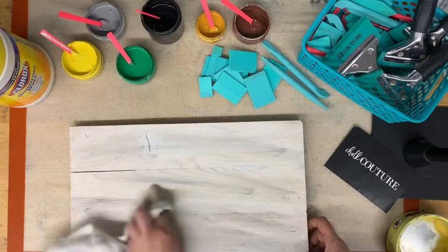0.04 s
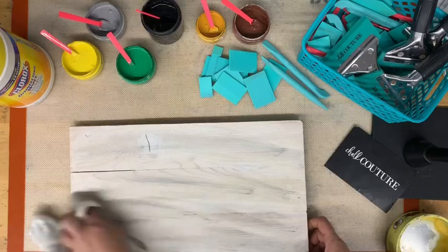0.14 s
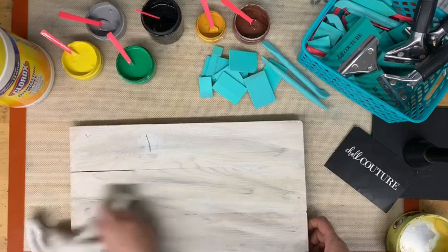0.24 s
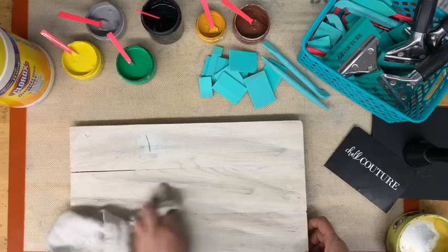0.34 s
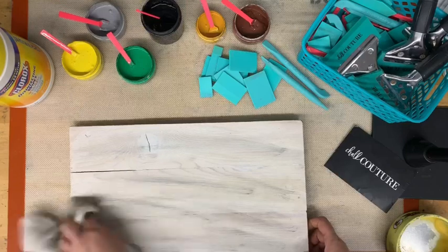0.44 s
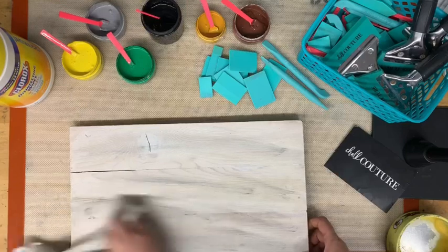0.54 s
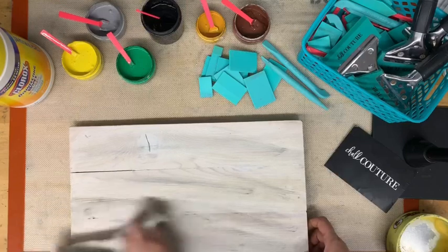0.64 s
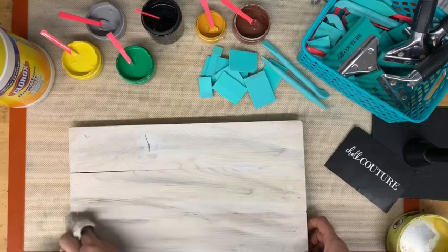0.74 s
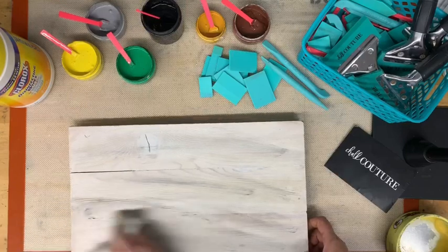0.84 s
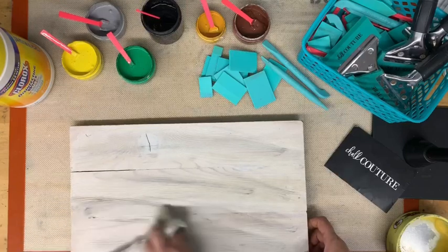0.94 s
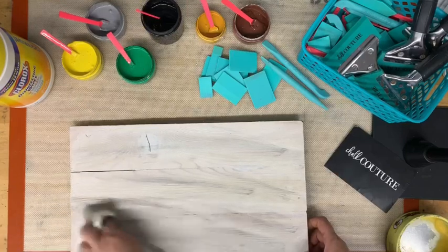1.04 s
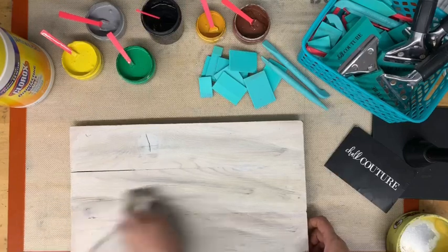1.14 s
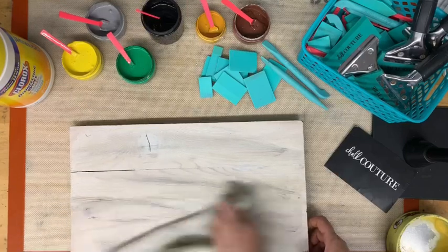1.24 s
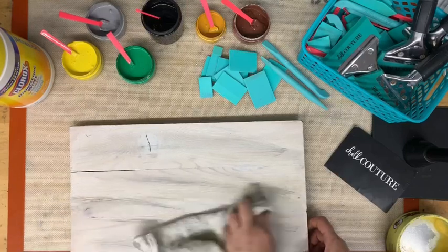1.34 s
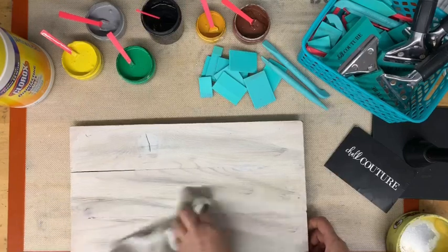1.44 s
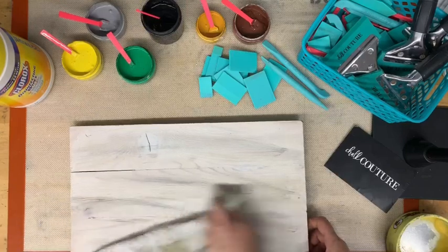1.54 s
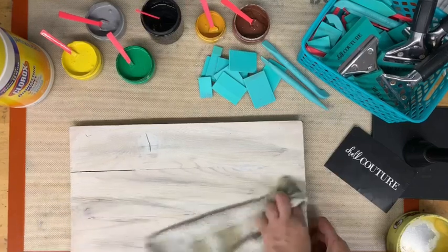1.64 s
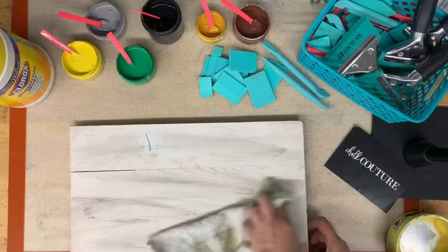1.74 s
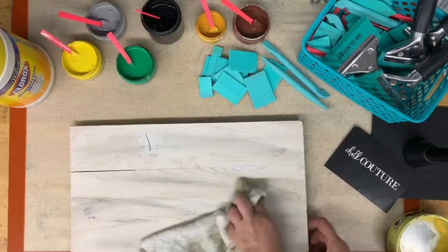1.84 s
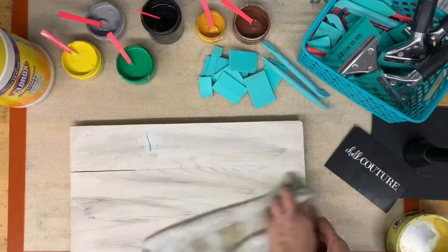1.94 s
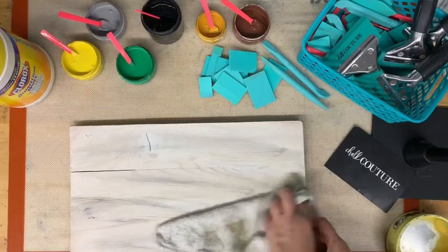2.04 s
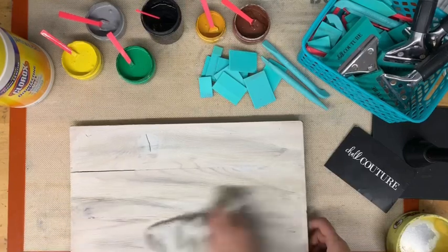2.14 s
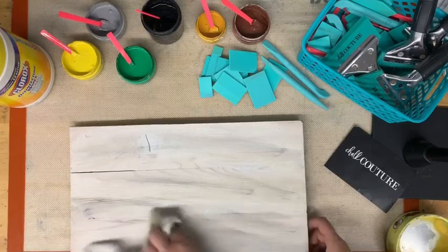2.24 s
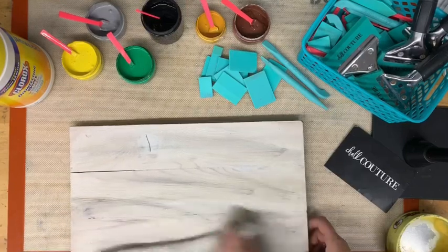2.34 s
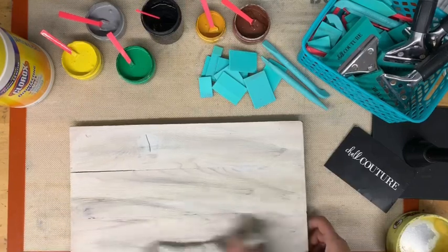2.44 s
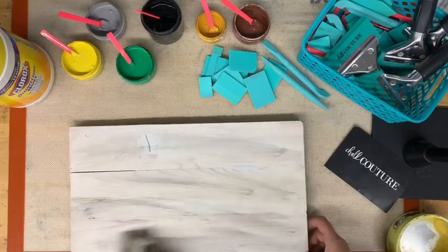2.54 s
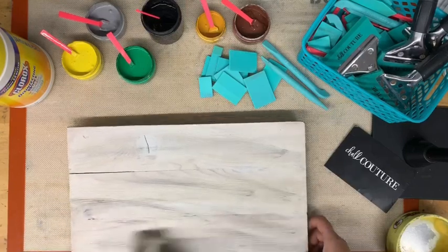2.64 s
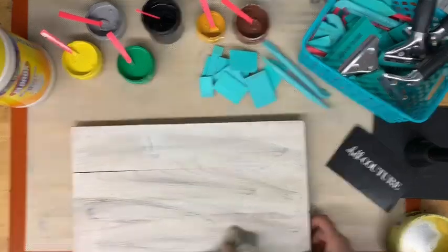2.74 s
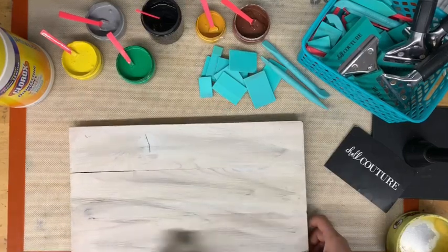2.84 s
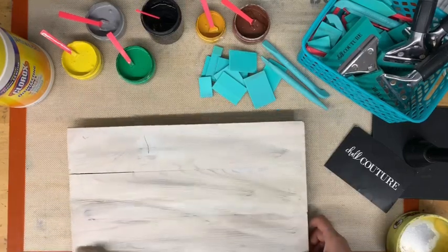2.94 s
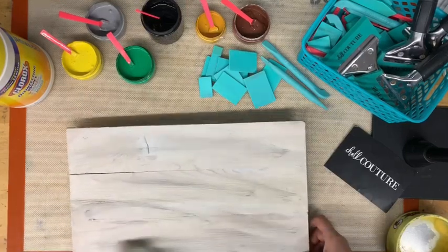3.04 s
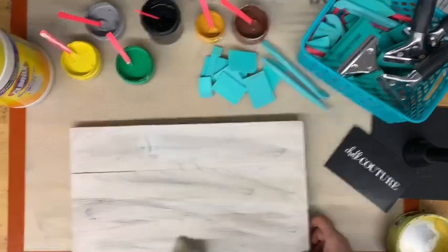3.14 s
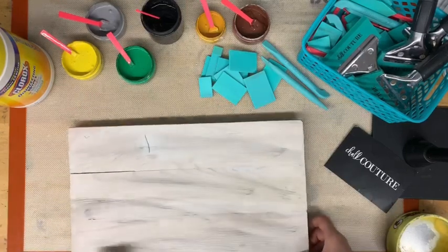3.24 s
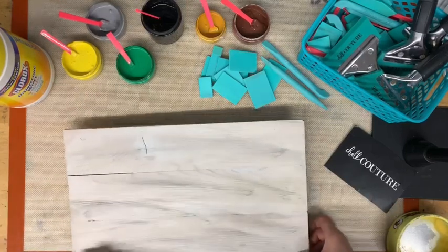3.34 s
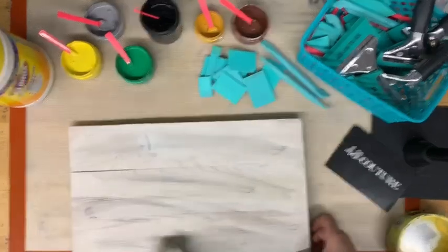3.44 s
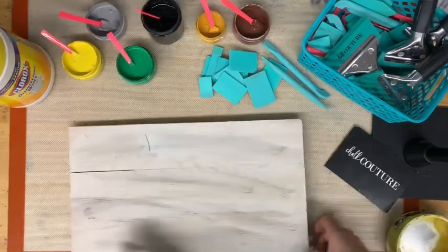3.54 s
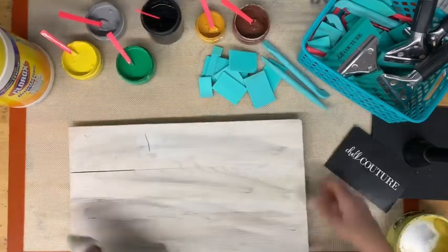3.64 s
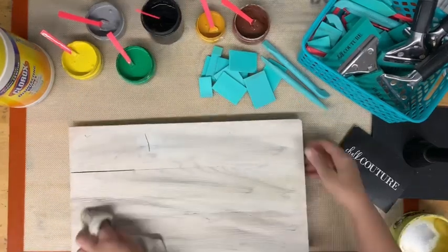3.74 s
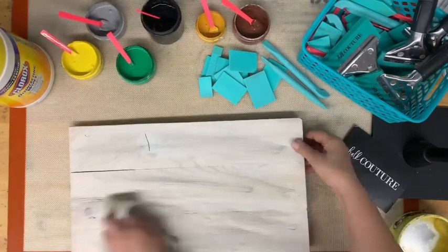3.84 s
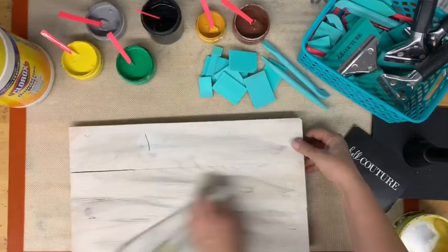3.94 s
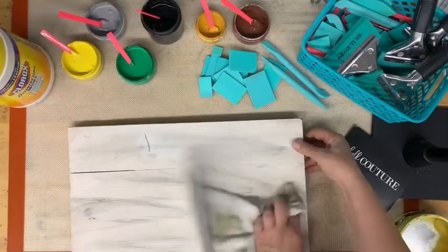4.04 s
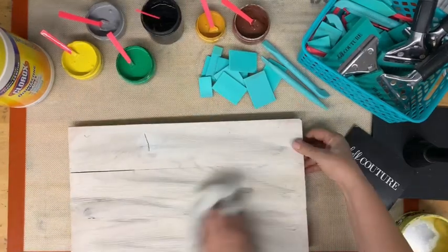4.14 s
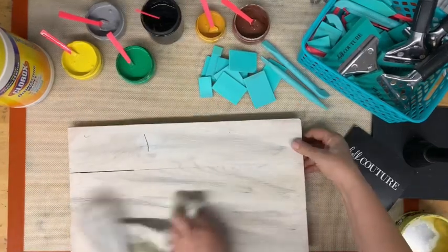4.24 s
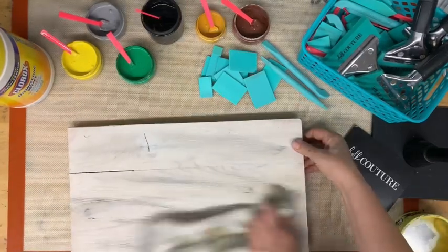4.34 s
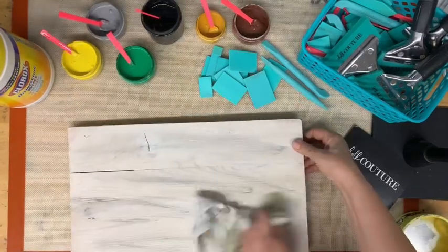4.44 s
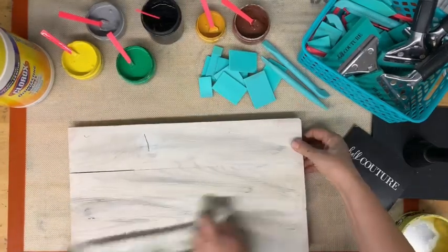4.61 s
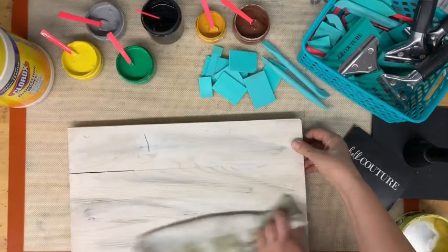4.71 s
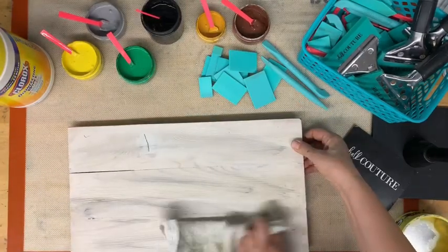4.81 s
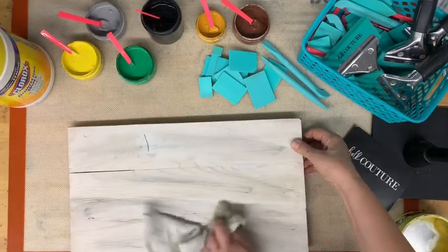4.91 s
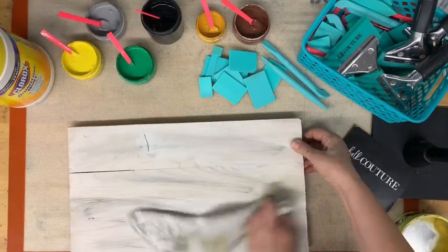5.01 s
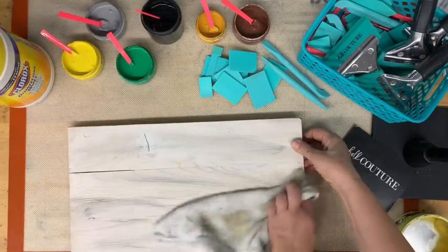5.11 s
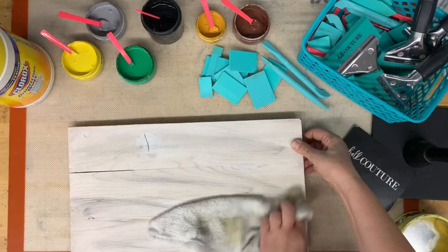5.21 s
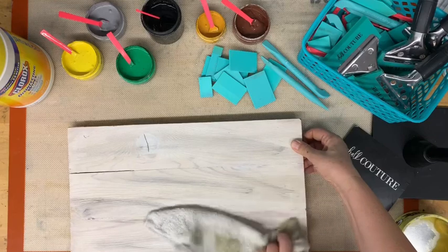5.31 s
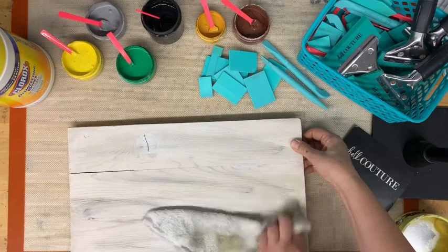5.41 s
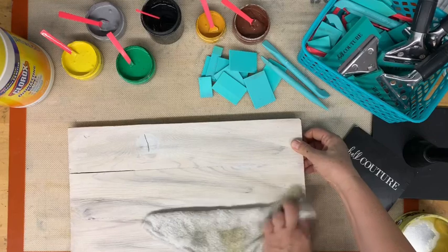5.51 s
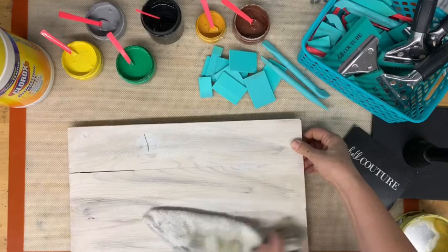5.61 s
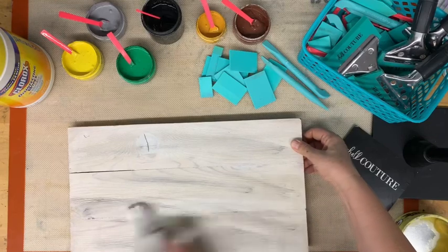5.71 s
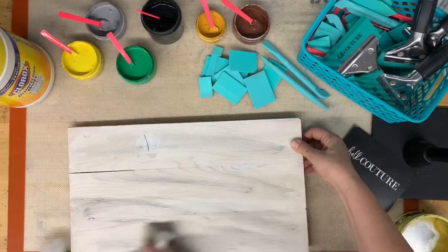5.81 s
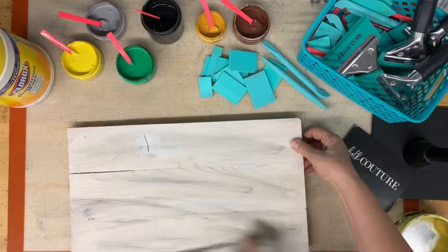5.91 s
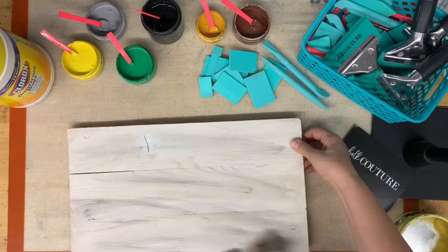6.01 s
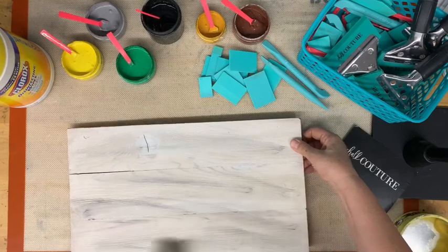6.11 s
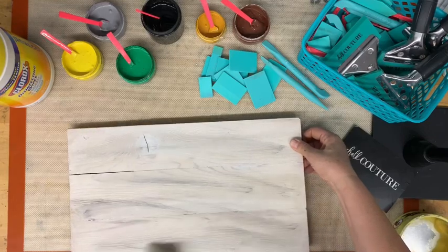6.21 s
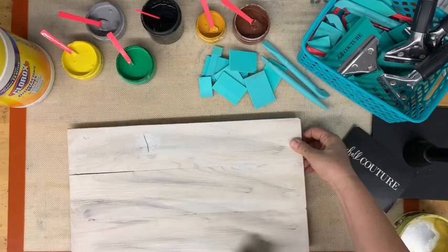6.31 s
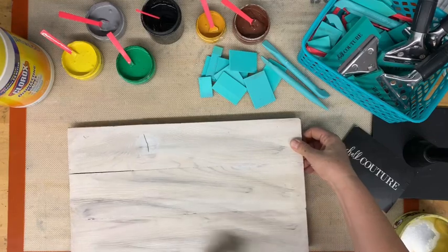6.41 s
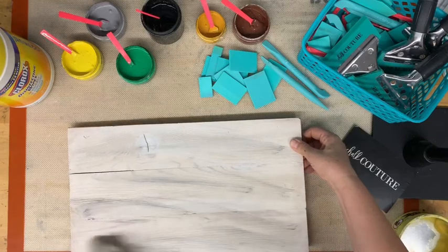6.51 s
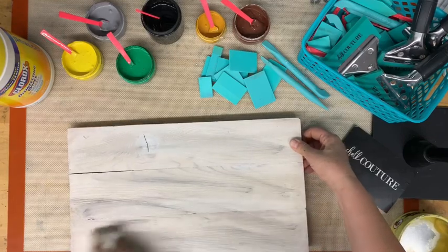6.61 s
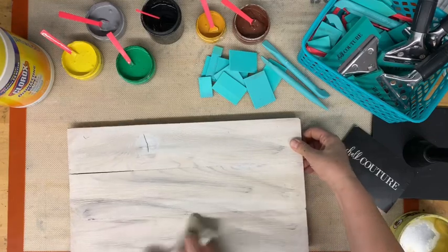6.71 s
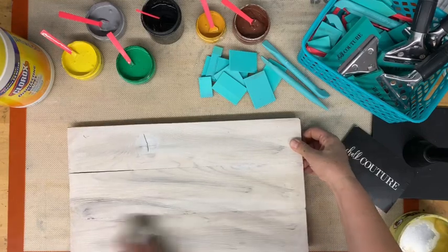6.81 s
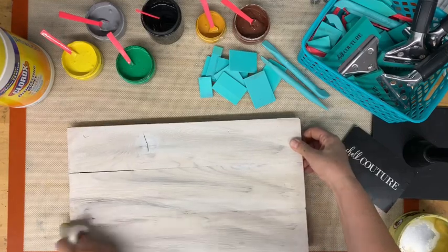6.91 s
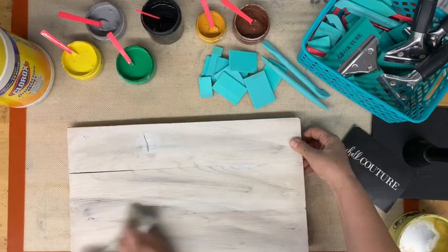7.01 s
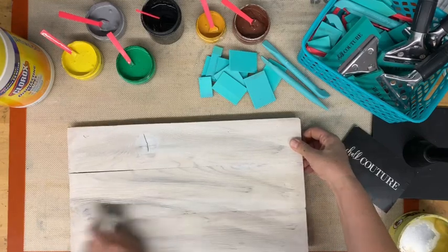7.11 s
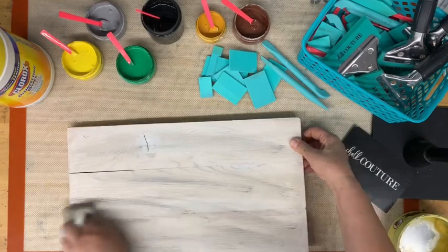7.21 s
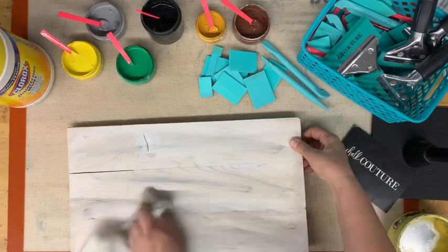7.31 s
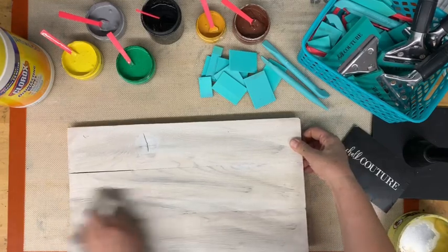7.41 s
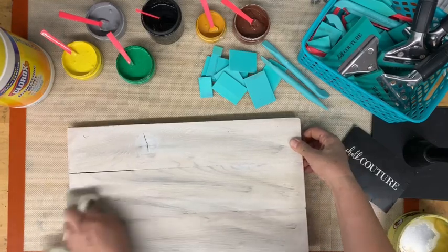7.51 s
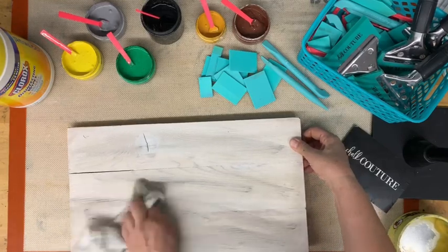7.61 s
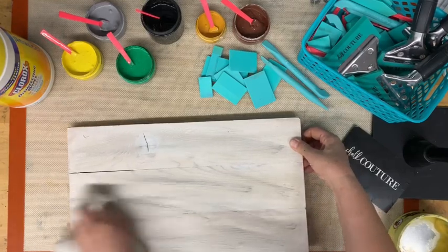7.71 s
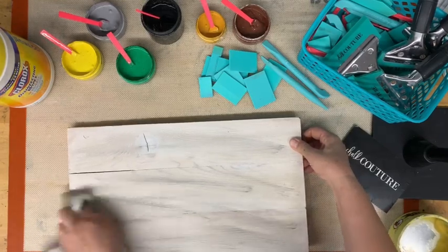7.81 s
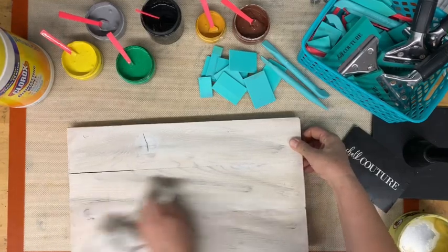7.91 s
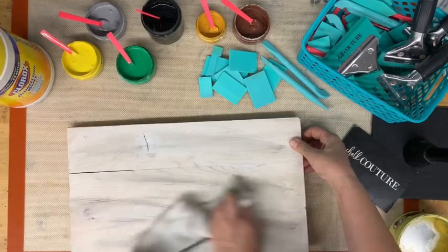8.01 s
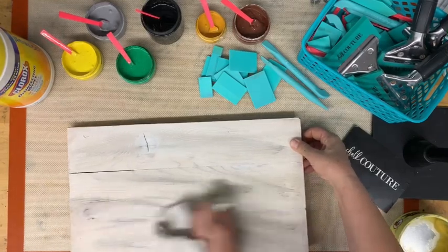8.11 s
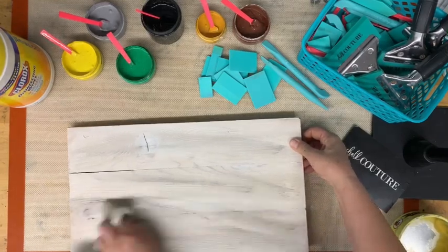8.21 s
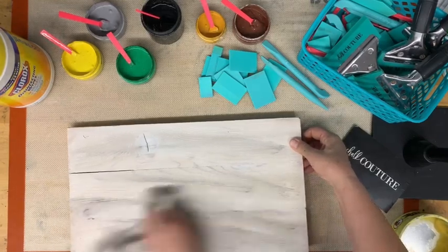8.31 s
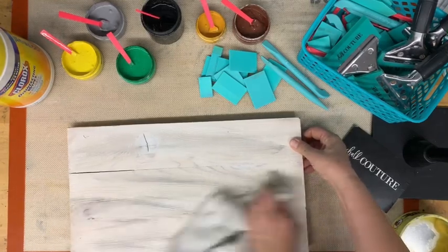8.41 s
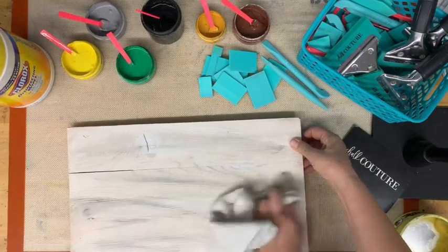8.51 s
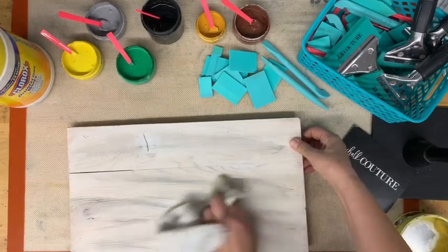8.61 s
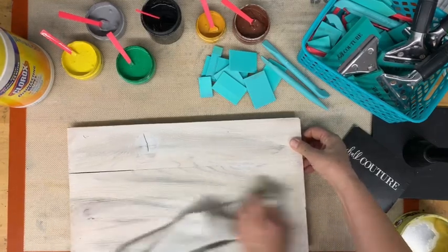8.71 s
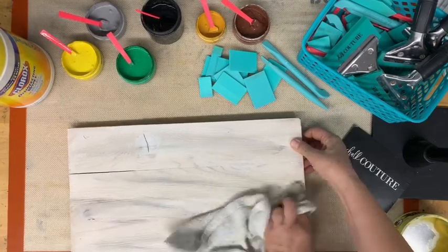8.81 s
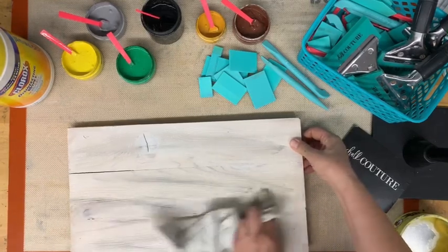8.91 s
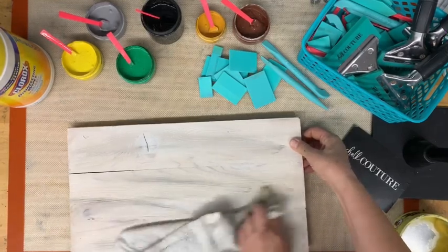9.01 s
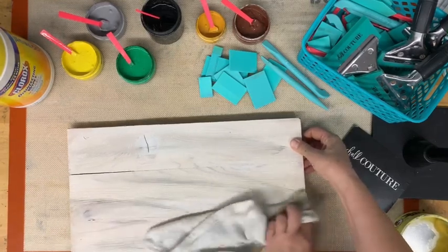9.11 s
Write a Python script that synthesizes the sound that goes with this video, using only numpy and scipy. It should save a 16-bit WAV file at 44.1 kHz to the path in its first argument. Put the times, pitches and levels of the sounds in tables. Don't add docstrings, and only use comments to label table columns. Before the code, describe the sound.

Close stereo pickup of fast cloth scrubbing on a loose board lying on a table. Airy fibre hiss swells and dips with each hand turn, with occasional small woody catches and muted thuds. Three sharp, very loud hollow slaps interrupt around the three-second mark, followed by a short pause in rubbing, then steady strokes continue, somewhat firmer around six to seven seconds. Quiet fan rumble and hum, short room reflections.

```python
import sys
import numpy as np
from scipy import signal
from scipy.fft import rfft, irfft, next_fast_len
from scipy.io import wavfile
from scipy.ndimage import uniform_filter1d, map_coordinates

SR = 44100
rng = np.random.default_rng(int(sys.argv[2]) if len(sys.argv) > 2 else 0)


def inscribe(sig):
    pcm = np.round(np.clip(np.atleast_2d(sig).T, -1, 1) * 32767)
    wavfile.write(sys.argv[1], SR, pcm.astype(np.int16))


def volts_from_decibels(level):
    exponent = np.asarray(level, float) / 20
    return 10 ** exponent


N = 403515

# (starting turn [s], pressure [dB], hiss left at the turn [dB], grip on wood [dB])
HAND_STROKES = [(-0.06, -43.5, -12, 1), (0.084, -41.5, -15, -1.5), (0.234, -42.0, -9.5, 1.5),
                (0.383, -41, -16, -2), (0.52, -43, -10.5, 1.5), (0.668, -41.0, -18, -1),
                (0.81, -40.5, -7.5, -3), (0.982, -46.0, -7, -1), (1.122, -43.5, -11, 1),
                (1.375, -49.5, -18, 4.5), (1.522, -46, -12, 0), (1.739, -50.5, -18, 2.5),
                (1.891, -46, -23, 0), (2.068, -47, -31, 0.5), (2.297, -43.5, -7, -0.5),
                (2.463, -40.0, -17, 0), (2.644, -42.5, -12.5, 3), (2.826, -41, -10, -1),
                (3.023, -44, -8.5, 2), (3.206, -44.5, -5, 3), (3.377, -44, -14, 5), (3.647, -47.5, -6, 2.5),
                (3.776, -42.5, -8.5, 2.5), (4.11, -45.5, -7, 4.5), (4.277, -42, -14, -1.5),
               (4.455, -44.5, -9.5, 0.5), (4.624, -43.5, -12.5, 0.5), (4.808, -45.5, -12.5, -1.5),
               (4.968, -44, -16, 2), (5.191, -45, -29, 6), (5.404, -45, -33, 5), (5.541, -43, -9, 0),
               (5.835, -39, -9.5, -4), (6.032, -41.5, -9, -3), (6.226, -41, -8.5, -0.5),
               (6.413, -37.5, -24, -3.5), (6.631, -38, -20.5, -1), (6.796, -36.5, -22, -4),
               (6.965, -41.5, -11, 0), (7.104, -42, -10.5, 0.5), (7.25, -41.5, -9, 2),
               (7.397, -42, -14, -2), (7.548, -41.0, -12, 0.5), (7.7, -40, -25, -2), (7.846, -41, -13, 3.5),
               (8.116, -43, -21, -1.5), (8.302, -40, -9, -0.5), (8.533, -46.5, -20, 1),
               (8.7, -45, -11, 2.5), (8.866, -46.5, -15, -0.5), (9.029, -43.5, -21.5, 0.5)]
STROKES = HAND_STROKES
# (frequency [Hz], level [dB], t60 [s])
TABLE_MODES = [(65.3, -7, 0.24), (88.2, -9.5, 0.28), (108.3, 0, 0.16), (152, -1.5, 0.062)]
# (frequency [Hz], level [dB], t60 [s])
BOARD_MODES = [(251.5, -8.5, 0.12), (271.7, -9.5, 0.4), (327, -1, .22), (354, -1.5, 0.13), (364, -9, 0.085),
               (385, -4, 0.1), (431, -5.5, 0.16), (530, -17, 0.077), (596, -30, 0.06), (673, 0, 0.13),
               (773, 0, 0.069), (930, -31, 0.124), (1050, -3, 0.07)]


def unit(x):
    return x / np.sqrt(np.mean(x ** 2) + 1e-20)


def along(points, hz):
    f, v = np.transpose(points)
    return np.interp(np.log(hz + 1), np.log(f + 1), v)


def wobble(knots_per_s):
    knots = rng.standard_normal(int(N * knots_per_s / SR) + 4)
    coarse = map_coordinates(knots, [np.arange(0, N + 8, 8) * knots_per_s / SR])
    return np.interp(np.arange(N) / 8, np.arange(len(coarse)), coarse)


def filtered(x, response):
    m = next_fast_len(N + 8192, True)
    return irfft(rfft(x, m) * response(np.fft.rfftfreq(m, 1 / SR)), m)[..., :N]


def resonances(modes):
    def response(f):
        return sum((-1) ** k * volts_from_decibels(db) * 1j * f * width / (hz * hz - f * f + 1j * f * width)
                   for k, (hz, width, db) in enumerate(modes))
    return response


def patchy(depth_db):
    z = signal.stft(rng.standard_normal((2, N)), nperseg=512)[2]
    field = uniform_filter1d(rng.standard_normal(z.shape[1:]), 2, 0)
    field = uniform_filter1d(field, 9, 1)
    return signal.istft(z * volts_from_decibels(depth_db * unit(field)), nperseg=512)[1][:, :N]


def lead(hz):
    # (frequency [Hz], left leads by [rad])
    lead_rad = [(0, 0), (500, -.4), (1600, 0), (2750, 1.1), (4000, 1.85), (4900, 3.14), (9080, 9.42),
                (13250, 15.71), (16000, 19.6)]
    plain = np.interp(hz, *np.transpose(lead_rad))
    return plain - 0.38 * np.sin(2 * plain) * (hz > 3600)


def ports(pair, colour):
    # (frequency [Hz], likeness [0-1])
    alike = [(30, .999), (130, .99), (400, 0.76), (1500, 0.93), (2600, 0.92), (4000, 0.44), (16000, 0.47)]

    def share(hz):
        by_lead = np.where(hz > 3600, 0.03 + 0.97 * np.sin(lead(hz)) ** 2, 1)
        apart = (1 - along(alike, hz)) * by_lead
        turn = np.arccos(np.clip(1 - apart, -1, 1)) / 2
        return colour(hz) * [np.cos(turn), np.sin(turn)]
    mid, side = filtered(pair, share)
    return unit(np.array([mid + side, mid - side]))


def hand():
    last_turn_s = 9.17
    s, _, rest_db, _ = np.transpose(STROKES)
    s, t = np.append(s, last_turn_s), np.arange(N) / SR
    turn_s = 0.02 + 0.0025 * np.abs(np.append(rest_db, rest_db[-1]))
    k = np.clip(np.searchsorted(s, t, "right") - 1, 0, len(s) - 2)
    u = np.clip((t - s[k]) / (s[k + 1] - s[k]), 0, 1)
    since, until = (t - s[k]) / turn_s[k], (s[k + 1] - t) / turn_s[k + 1]
    edge = np.clip(np.minimum(since, until), 0, 1)
    speed = np.sin(np.pi / 2 * edge) ** 0.9 * np.abs(np.sin(np.pi * u)) ** 0.45
    return k, u, speed


def effort():
    lean = 0.38
    lift_s, lift_db_per_s = 3.495, 280
    settle_s, settle_db_per_s = 3.91, 150
    lifted_db = -26
    s, press_db, rest_db, grip_db = np.transpose(STROKES)
    t = np.arange(N) / SR
    k, u, speed = hand()
    next_db = np.append(press_db[1:], press_db[-1])
    leaning_db = press_db[k] + lean * (next_db - press_db)[k] * (u - 0.5)
    away_db = np.maximum(lift_db_per_s * (lift_s - t), settle_db_per_s * (t - settle_s))
    contact_db = np.clip(away_db, lifted_db, 0)
    return leaning_db, np.interp(t, s, press_db + rest_db), grip_db[k], contact_db, speed


def cloth():
    # (frequency [Hz], level per Hz [dB])
    fibre_colour = [(60, -47), (150, -33), (500, -2), (1500, 0.5), (2500, -2), (4200, 3), (6500, -1.5),
                    (10000, -2.5), (15500, -5), (17000, -17)]
    # time [s], level [dB], half length [s]
    flick = (3.712, -52, 0.018)
    flick_s, flick_db, flick_half_s = flick
    t = np.arange(N) / SR
    press_db, rest_db, grip_db, contact_db, speed = effort()
    creep = volts_from_decibels(rest_db + 2 + contact_db)
    force = volts_from_decibels(press_db + 0.5 + contact_db + 0.11 * wobble(25)) * speed

    grit = volts_from_decibels(0.44 * wobble(900))
    hiss = ports(grit * patchy(depth_db=3.0), lambda hz: volts_from_decibels(along(fibre_colour, hz)))
    hiss = hiss + 0.022 * wobble(5) * np.gradient(hiss, axis=1) * [[1], [-1]]
    dull = filtered(hiss, lambda hz: 1 / (1 + 1j * hz / 3000))
    tilt = -0.1 + 0.099 * grip_db
    rubbing = force * (hiss + tilt * dull)

    loose = np.array([hiss[0, ::-1], np.roll(hiss[1], SR)])
    resting = creep * (0.8 * dull + 0.23 * hiss + 0.19 * loose)

    brush = unit(filtered(hiss, resonances([(5650, 700, 0)])))
    brush_gain = volts_from_decibels(flick_db) * np.exp(-((t - flick_s) / flick_half_s) ** 2)
    return brush_gain * brush + rubbing + resting


def wood():
    # (frequency [Hz], width [Hz], level [dB])
    low_modes = [(601, 64, -8.5), (621, 120, -9.5), (673, 32.5, 0.5)]
    # (frequency [Hz], width [Hz], level [dB])
    middle_modes = [(768, 135, 0), (845, 79, 3), (910, 14.2, 5.5), (1077, 44, 0.5)]
    # (frequency [Hz], width [Hz], level [dB])
    high_modes = [(1278, 120, 3), (1440, 77, -3.5), (1711, 41, 8.5), (1952, 77, 9.5), (2170, 250, -4),
                  (3000, 115, -0.5)]
    # (level at mean pressure [dB], felt share of pressure, of grip, of the lift [ratios])
    shake = [(-52.5, 0.24, 0.18, 0.089), (-51.5, .8, 0.79, 0.41), (-53.5, 0.89, 0.78, 0.47)]
    # (time [s], low group [dB], middle [dB], upper [dB])
    drags = [(.15, -1, -3, -1), (.205, 2, 7, 4), (.84, -2, -3, -2), (.89, 7, 0, 8.5), (1.22, -2, 1, 0),
             (4.8, -3, -2, 2), (8.08, -4, -3.5, -3), (8.9, 1, 2, 3), (2.21, 2, 4, 4), (3.46, 4, -4, 9),
             (3.98, 2, 5, 2), (4.34, 5.5, 0, 5), (4.92, 3, 9, -4), (5.27, 2, 7, 7), (5.75, 6, 5, 3),
             (6.29, 2.5, -2, 6), (6.47, 8, -3, 4), (6.93, 1.5, 8, 7.5), (7.03, 11, -3, 8.5), (7.3, 1, 4, 3),
             (7.64, 0, 3, -2), (7.79, 7.5, 14, 2), (8.23, 6, 5, 4), (8.39, 6, 11, 8.5), (8.8, -1, 2, 2)]
    drag_half_s = 0.033
    still = 0.35
    press_db, rest_db, grip_db, contact_db, speed = effort()
    moving = volts_from_decibels(still * (rest_db - press_db) - 3) + 0.71 * speed
    press_db = uniform_filter1d(press_db - press_db.mean(), size=SR // 40)
    grip_db = uniform_filter1d(grip_db, size=SR // 40)

    t, coarse_s = np.arange(N) / SR, np.arange(0, N / SR + 0.01, 0.005)
    s, *extra_db = np.transpose(drags)
    swells_db = extra_db @ np.exp(-((coarse_s - s[:, None]) / drag_half_s) ** 2)
    tugs = volts_from_decibels(2.8 * wobble(40) + 0.44 * wobble(200))
    shaking = tugs * patchy(depth_db=2.5)
    groups = []
    for (db, press, grip, lift), swell_db, modes in zip(shake, swells_db, (low_modes, middle_modes, high_modes)):
        level_db = db + press * press_db + grip * grip_db + lift * contact_db
        level_db = level_db + np.interp(t, coarse_s, swell_db)
        groups.append(volts_from_decibels(level_db) * ports(shaking, resonances(modes)))
    low, middle, upper = groups
    return moving ** 0.28 * low + moving * (middle + upper)


def fan():
    # (frequency [Hz], level per Hz [dB])
    air_colour = [(20, -2.5), (60, 1.5), (110, -13), (170, -8), (330, -6.5), (480, -9), (700, -21.5),
                  (1500, -17), (3000, -30), (5000, -21), (7000, -40), (16000, -61)]
    air = ports(patchy(depth_db=4.5), lambda hz: volts_from_decibels(along(air_colour, hz)))
    rumble = filtered(volts_from_decibels(5.3 * wobble(9)) * rng.standard_normal(N),
                      resonances([(34.5, 39, -3.5), (62.4, 33, -3), (88.3, 17.3, -2)]))
    phase = 2 * np.pi * 119 * np.arange(N) / SR + 0.57 * wobble(12)
    hum = volts_from_decibels(1.8 * wobble(8)) * np.sin(phase)
    return volts_from_decibels(-58.0) * air + volts_from_decibels(-57.0) * unit(rumble) + volts_from_decibels(-56.5) * unit(hum)


def ring(modes, t, rise_s):
    out = 0
    for hz, db, t60 in modes:
        decay = volts_from_decibels(db + rng.normal(0, 1.6) - 60 * t / t60)
        out = out + decay * np.sin(2 * np.pi * hz * t + rng.normal(0, 0.63))
    return out * (1 - np.exp(-t / rise_s))


def bumps():
    # (time [s], peak [dB], table thump [dB])
    rocks = [(0.984, -26, -15), (1.413, -38, -8), (1.672, -30, -10.5), (1.847, -53, 5), (1.958, -41, -4.5),
             (2.206, -23.5, -14.5), (2.49, -42.5, -3.5), (3.011, -34, -14), (3.811, -26, -12.5),
             (4.321, -38, -10), (4.347, -34.5, -17), (4.601, -53.5, 4), (5.189, -49, 2), (5.512, -41.5, -9),
             (5.742, -33, -9), (6.145, -54, 8), (6.536, -40, -3), (6.74, -34, -11.5), (7.116, -51, 5),
             (8.349, -48, -16)]
    # (time [s], peak [dB], ring [Hz])
    catches = [(0.397, -43, 705), (0.872, -33, 687), (2.197, -38, 740), (3.791, -44, 672),
               (4.14, -36.5, 614), (4.319, -38, 1304), (4.322, -28.5, 727), (4.347, -27, 690),
               (5.426, -35, 673), (6.818, -33, 655), (6.991, -35, 680), (7.203, -32.5, 692),
               (7.279, -33, 1227), (7.611, -39, 690), (8.191, -35, 778), (8.781, -32.5, 673)]
    out, t = np.zeros(N + SR), np.arange(SR // 2) / SR
    soft = [(hz, db - 13 * (hz / 500) ** 2, 0.43 * t60) for hz, db, t60 in BOARD_MODES]
    for s, db, thump_db in rocks:
        thump = volts_from_decibels(thump_db + 10.5) * ring(TABLE_MODES, t, 0.0092)
        out[round((s + 0.003) * SR):][:len(t)] += volts_from_decibels(db) * (ring(soft, t, 0.0036) + thump)
    for s, db, hz in catches:
        modes = [(hz, 0, 0.07), (1.17 * hz, -7, 0.05), (1.49 * hz, -10, 0.03), (3.1 * hz, -14, 0.02)]
        out[round(s * SR):][:len(t)] += volts_from_decibels(db + 1.5) * ring(modes, t, 0.001)
    return out[:N]


def slaps():
    # (time [s], peak [dB], rattle [dB], table thump [dB], ringing time factor [ratio])
    blows = [
        (2.767, -3.5, -31, -27, 0.75),
        (3.139, -2.5, -15.5, -28, 0.69),
        (3.469, -2, -19, -27, 0.98),
    ]
    # (frequency [Hz], level per Hz [dB])
    rattle_colour = [(900, 7), (1050, 8.5), (1400, 1.5), (1900, -4.5), (2700, -20), (5000, -40),
                     (9000, -60)]
    # (frequency [Hz], level per Hz [dB])
    thud_colour = [(120, -28), (250, -1), (380, 6), (520, -4), (700, -5), (900, -8), (1200, -32),
                   (3000, -72)]
    out, t = np.zeros(N + SR), np.arange(SR // 2) / SR
    rattle = unit(filtered(rng.standard_normal(N), lambda hz: volts_from_decibels(along(rattle_colour, hz)) * (hz > 850)))
    thud = unit(filtered(rng.standard_normal(N), lambda hz: volts_from_decibels(along(thud_colour, hz))))
    push = 1.1 * np.exp(-((t - 0.0032) / 0.0011) ** 2) * np.cos(2 * np.pi * 640 * (t - 0.0031))
    after = np.maximum(t - 0.0016, 0)
    for s, db, upper_db, thump_db, lasting in blows:
        modes = [(hz, level_db, lasting * t60) for hz, level_db, t60 in BOARD_MODES]
        at = round((s + 0.00122) * SR)
        loose = volts_from_decibels(upper_db - 3.0 - 60 * after / 0.12) * rattle[at:][:len(t)]
        loose = loose + volts_from_decibels(-12.5 - 60 * after / 0.11) * thud[at:][:len(t)]
        body = volts_from_decibels(-11.5) * ring(modes, after, 0.0018) + loose * (1 - np.exp(-after / 0.00029))
        thump = volts_from_decibels(thump_db + 13.5) * ring(TABLE_MODES, after, 0.0092)
        blow = volts_from_decibels(db) * (push + body + thump)
        for early_s, faint_db in [(0, 0), (0.0048, -17), (0.011, -29)]:
            out[at - round(early_s * SR):][:len(t)] += volts_from_decibels(faint_db) * blow
    return out[:N]


def room(x):
    # (frequency [Hz], t60 [s])
    wall_t60 = [(100, 0.75), (400, 0.24), (1000, 0.27), (3000, 0.22)]
    hz, t, z = signal.stft(rng.standard_normal((2, SR // 2)), SR, nperseg=256)
    z = z * volts_from_decibels(-60 * t / along(wall_t60, hz)[:, None])
    tail = signal.istft(z, SR, nperseg=256)[1]
    tail[1] = tail[0] + 0.2 * tail[1] + 5 * np.diff(tail[1], prepend=0)
    late = np.pad(x, (250, 0))[None]
    return signal.fftconvolve(late, tail / np.linalg.norm(tail[0]), axes=1)[:, :N]


def scene():
    knocks = slaps() + bumps()
    return knocks + volts_from_decibels(-11.5) * room(knocks) + cloth() + wood() + fan()


def roll_off(x):
    return signal.sosfilt(signal.butter(12, 17050, fs=SR, output="sos"), x)


def record(dry):
    top_hz = 15780
    wide = filtered(dry, lambda hz: np.exp(0.5j * np.outer([1, -1], lead(hz))) * (hz < top_hz))
    held = wide / (1 + np.abs(wide / 1.15) ** 8) ** (1 / 8)
    return roll_off(held)


dry = scene()
out = record(dry)
inscribe(out)
```